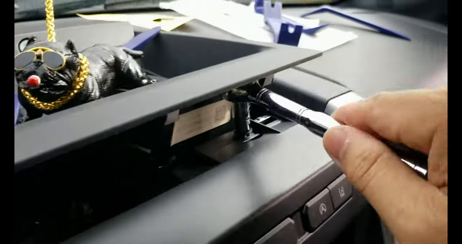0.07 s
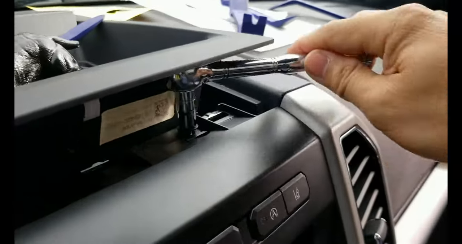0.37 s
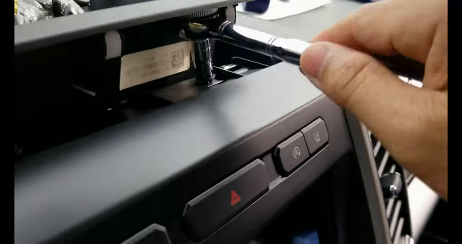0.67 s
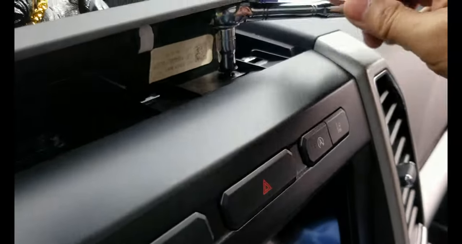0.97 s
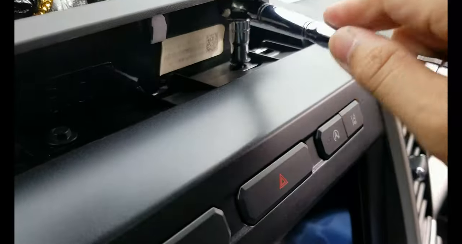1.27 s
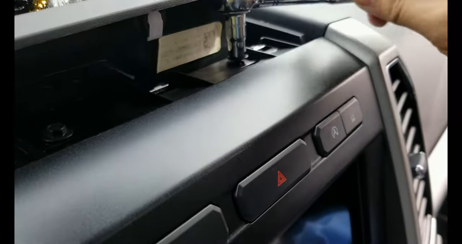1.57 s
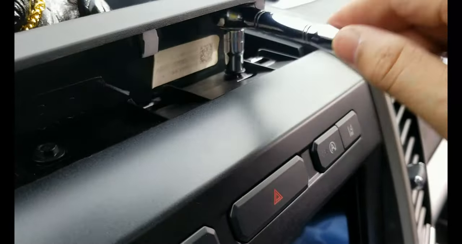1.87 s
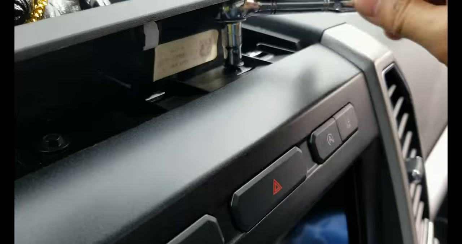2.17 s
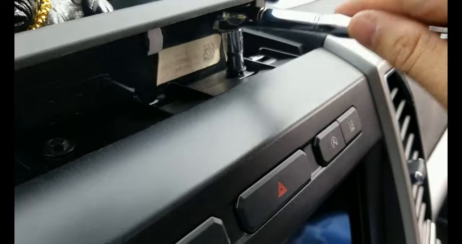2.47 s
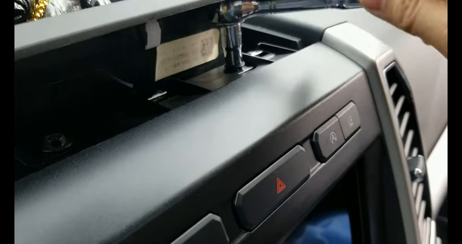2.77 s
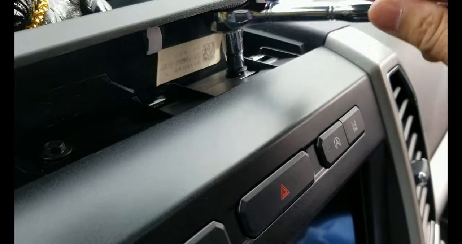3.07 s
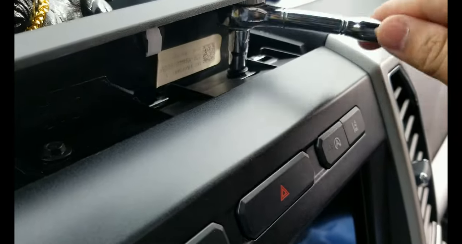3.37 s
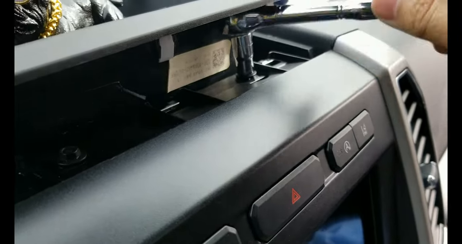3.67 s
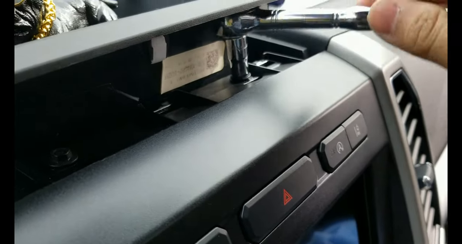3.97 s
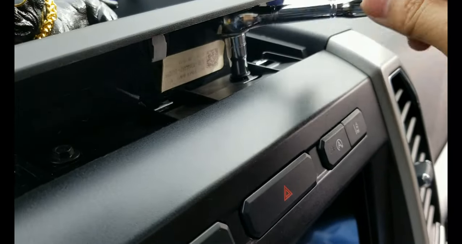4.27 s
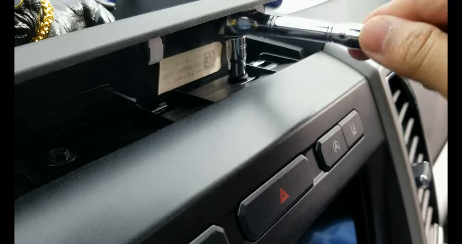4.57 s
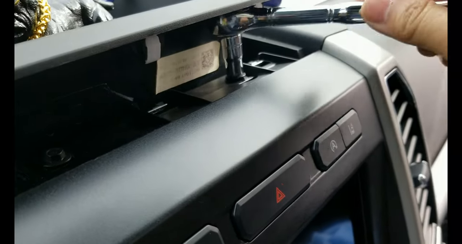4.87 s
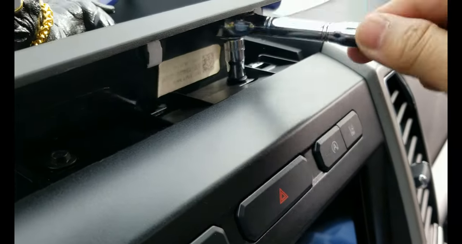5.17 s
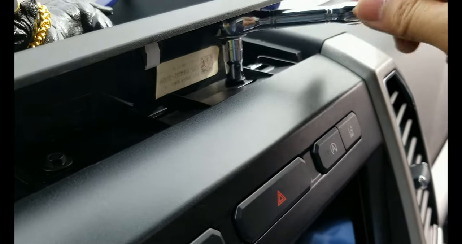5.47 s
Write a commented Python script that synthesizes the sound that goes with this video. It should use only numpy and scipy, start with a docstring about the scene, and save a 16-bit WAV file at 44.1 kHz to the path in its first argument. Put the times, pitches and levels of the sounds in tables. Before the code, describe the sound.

A hand ratchet turns a bolt in a dashboard, heard close and mostly on the left in a quiet vehicle cabin with a very brief echo. The tool slides faintly, then at about 0.2 seconds comes the first back swing: a quick run of five crisp, bright clicks with a slight steel ring. Similar runs of five to eight clicks follow at about 0.8, 1.3, 1.9, 2.5, 3.0, 3.6, 4.2 and 4.8 seconds, each lasting a tenth to a fifth of a second and slowing at its end. Between them, the forward strokes are much quieter, with soft socket knocks, thread rubbing and a faint low dashboard rumble. Sharper metal knocks mix into some runs, notably near 1.4, 2.5 and 3.7 seconds. The last run starts at 5.4 seconds, pauses briefly and adds two clicks, followed by a soft knock around 5.7 seconds.

```python
"""A hand ratchet drives a bolt into a dashboard bracket in a parked vehicle.
First the tool slides faintly on the bolt. Then the handle swings back: the pawl, a small sprung catch,
snaps over the teeth, fast and then slower, and rings the steel head. On the forward stroke the loose
socket knocks, the thread rubs and the dashboard rumbles. Back swing and stroke come ten times, the
last swing with a pause in it, and the small cabin answers with a brief echo."""
import sys
import numpy as np
from scipy import signal
from scipy.fft import rfft, irfft, next_fast_len
from scipy.io import wavfile
from scipy.ndimage import uniform_filter1d, map_coordinates

SR = 44100
rng = np.random.default_rng(int(sys.argv[2]) if len(sys.argv) > 2 else 0)


def inscribe(sig):
    """Save sig as 16-bit PCM at rate SR to the path in sys.argv[1].

    A 1-D sig is mono; a 2-D sig holds one channel per row.
    Samples are clipped to [-1, 1] before scaling.
    """
    pcm = np.round(np.clip(np.atleast_2d(sig).T, -1, 1) * 32767)
    wavfile.write(sys.argv[1], SR, pcm.astype(np.int16))


N = 251811
HIT = np.arange(5120) / SR  # time within one hit, in s

# the tones (modes) each part rings with: f/Hz, level/dB, t60/s (time to fade by 60 dB)
PAWL_MODES = [(5650, -12.5, .028), (10150, -7.5, .031), (12950, -7, .024), (13300, -5, .024),
              (14050, -4, .006), (14550, -6, .006), (15300, -7, .006)]
HEAD_MODES = [(1575, -9.5, 0.012), (1803, -2.5, 0.028), (1957, 2.5, 0.02), (2116, -6.5, 0.021),
              (2690, -16, 0.032), (3210, -10.5, 0.017)]
DASH_MODES = [(198.4, -22, 0.22), (333, -16, .08), (609, -7.5, 0.053), (694.4, 2, 0.036), (991, 2.5, 0.043),
              (1148, 2.5, 0.048)]
# tone colours of steel clack, dashboard thud, rumble and hiss: f/Hz, level/dB
CLACK = [(800, -36), (1400, -2.5), (2000, 6), (2600, -8.5), (3300, -15.5), (4500, -13.5), (9000, -25.5)]
THUD = [(40, -43), (100, -13.5), (250, -2), (450, -11.5), (700, -0.5), (1150, 2), (1600, -15),
        (4000, -41.5)]
RUMBLE = [(20, -27), (40, -9), (62, 4), (95, -0.5), (135, 3.5), (165, -5.5), (195, -0.5), (240, -12.5),
          (330, -1.5), (480, -22), (1000, -48)]
HISS = [(1500, -20), (3200, 8), (4800, -3), (6800, 4.5), (9000, -13), (11000, -7), (15000, -15.5),
        (16500, -14.5)]
# back swings, the last split over two rows:
# first click t/s, teeth, gap at full speed/s, last gap/s, braking (0 = sudden stop, 1 = even gaps)
SWINGS = [(.173, 5, .0165, .032, .6), (.7558, 5, .014, .0407, .51), (1.3326, 7, .0162, .037, .11),
          (1.908, 7, .0148, .0393, .36), (2.4737, 8, .0146, .0592, .42), (3.0405, 7, .0172, .049, .45),
          (3.6433, 7, .0129, .0385, .53), (4.2202, 7, .0135, .0325, .52), (4.8215, 6, .0133, .0462, .56),
          (5.4112, 6, .017, .022, .2), (5.542, 2, .039, .039, .5)]
# force of each swing: snap/dB, its change over the swing/dB, accent on every second tooth/dB,
# head ring/dB, dashboard knock/dB, rub/dB, rumble/dB, rubbing before the first click/s
EFFORT = [(-23.5, -0.5, 1, -27, -35.5, -48.5, -53.5, 0.017),
          (-26, 2.5, -3.5, -29, -36.5, -45, -50.5, 0.017), (-21.5, 5, 3, -27, -34.5, -43, -43, 0.011),
          (-19.5, -4, -1, -26.5, -36.5, -48.5, -52.5, 0.063), (-24, -5, 1, -27, -37, -51, -50.5, 0.046),
          (-24.5, 1, -1, -30.5, -37, -46, -47.5, 0.0081), (-22.5, 2, -2.5, -26, -32.5, -48.5, -49.5, 0.034),
          (-25, -8, -3, -27.5, -35, -47.5, -46.5, 0.028),
          (-24, 6.5, -2.5, -28.5, -36.5, -47.5, -53.5, 0.0044),
          (-19.5, -3, 3.5, -26.5, -36, -44.5, -47.5, .005), (-22.5, -4, 6, -28.5, -36, -44.5, -46, .005)]
# forward strokes: socket catches t/s, wait until the bolt takes the load/s, knock/dB, rub/dB, rumble/dB
STROKES = [(.426, 0.042, -43, -48, -43.5), (0.994, 0.039, -46, -50.5, -48), (1.537, .078, -40, -52, -45),
           (2.174, 0.014, -42.5, -46, -47), (2.754, 0.015, -46, -73, -46),
           (3.288, 0.023, -47.5, -51.5, -45), (3.867, 0.055, -41, -46.5, -46),
           (4.492, 0.0071, -42, -56, -51), (5.097, 0.0084, -40.5, -49.5, -48),
           (5.633, 0.046, -47, -50.5, -46.5)]


def amp(db):
    """Turn decibels into a gain."""
    return 10 ** (np.asarray(db) / 20)


def unit_rms(x):
    """Scale to an average power of 1."""
    return x / np.sqrt(np.mean(x ** 2) + 1e-20)


def unit_energy(x):
    """Scale each row to a total energy of 1."""
    return x / np.linalg.norm(x, axis=-1, keepdims=True)


def fade(t60):
    """Die away by 60 dB every t60 seconds."""
    return np.exp(-np.log(1000) * HIT / t60)


def along(points, hz):
    """Read between (f/Hz, value) points on a log frequency axis."""
    f, value = np.transpose(points)
    return np.interp(np.log(hz + 1), np.log(f + 1), value)


def wobble(rate):
    """A smooth random curve through rate points a second."""
    points = rng.standard_normal(int(N * rate / SR) + 4)
    return map_coordinates(points, [np.arange(N) * rate / SR])


def filtered(x, response):
    """Multiply each frequency in x by response(hz)."""
    size = next_fast_len(N + SR // 2)
    return irfft(rfft(x, size) * response(np.fft.rfftfreq(size, 1 / SR)), size)[..., :N]


def causal(colour):
    """A filter of this colour that never sounds before it is hit (minimum phase)."""
    size = len(HIT)
    cepstrum = irfft(np.log(amp(along(colour, np.fft.rfftfreq(size, 1 / SR)))))
    cepstrum[1:size // 2] *= 2
    cepstrum[size // 2 + 1:] = 0
    return np.exp(rfft(cepstrum))


def rush(colour, apart):
    """Stereo noise; apart (radians) makes the two sides less alike."""
    mid, side = filtered(rng.standard_normal((2, N)), lambda hz: amp(along(colour, hz)))
    return unit_rms(np.cos(apart) * mid + np.sin(apart) * np.array([side, -side]))


def still_air():
    """A very faint, low hush lies under everything."""
    # f/Hz, level/dB
    hush = [(30, -13.5), (70, 10.5), (300, -21.5), (2000, -19.0), (4000, -22.0), (15000, -18)]
    return amp(-78) * rush(hush, apart=0.37)


def swells(starts, lengths, levels_db, rise, fall):
    """Summed power of movements that rise, hold and fall; rise and fall are in dB/s."""
    t = np.arange(N) / SR
    power = np.zeros(N)
    for start, length, db in zip(starts, lengths, levels_db):
        near = slice(*np.searchsorted(t, [start - .5, start + length + .5]))
        before = np.maximum(start - t[near], 0)
        after = np.maximum(t[near] - start - length, 0)
        power[near] += amp(db - rise * before - fall * after) ** 2
    return power


def tooth_times(start, teeth, fast_gap, last_gap, braking):
    """The hand brakes towards the end of a swing, so the gaps between clicks grow."""
    teeth_left = np.arange(round(teeth) - 1)[::-1]
    gaps = fast_gap + (last_gap - fast_gap) * np.clip(braking, 0, 1) ** teeth_left
    return start + np.append(0, np.cumsum(gaps))


def friction_levels():
    """Rumble, rub and hiss in dB over time: each swing, stroke and slide makes a swell."""
    # the tool slides as the hand leans on it: t/s, length/s, hiss/dB, rub/dB, rumble/dB
    slides = [(0, 0.03, -61.5, -57, -63.5), (0.305, 0.019, -69.5, -57, -48.5),
              (0.632, 0.079, -74, -58.5, -54.5), (1.148, 0.014, -70, -53.5, -49),
              (1.264, 0.054, -76, -51, -52), (1.456, 0.23, -58, -55, -55.5),
              (1.76, 0.25, -68.5, -61, -56.5), (2.243, 0.082, -81.5, -66, -59),
              (2.667, 0.057, -79, -61, -58), (3.272, 0.18, -67, -59.5, -58),
              (3.548, 0.16, -60.5, -47.5, -51), (4.091, .07, -69, -56, -63),
              (4.498, 0.035, -76, -50.5, -54.5), (4.713, 0.015, -87, -62.5, -60),
              (5.1, 0.019, -85, -58.5, -58), (5.354, .03, -91, -62, -62)]
    grip_rumble_db, grip_rub_db, grip_hiss_db = -65.5, -70.5, -87.5  # the hand is never quite still
    rumble_hold, rub_hold = .8, .73  # share of a swing before braking fades the sound
    settle_s = 0.0023  # the dashboard flexes on after the bolt takes the load
    first, last = np.transpose([tooth_times(*swing)[[0, -1]] for swing in SWINGS])
    *_, swing_rub, swing_rumble, lead = np.transpose(EFFORT)
    caught, slack, _, stroke_rub, stroke_rumble = np.transpose(STROKES)
    slid, length, slide_hiss, slide_rub, slide_rumble = np.transpose(slides)
    rumble = (amp(grip_rumble_db) ** 2
              + swells(first, rumble_hold * (last - first), swing_rumble, rise=270, fall=210)
              + swells(caught + slack, np.full_like(slack, settle_s), stroke_rumble, rise=330, fall=320)
              + swells(slid, length, slide_rumble, rise=260, fall=170))
    rub = (amp(grip_rub_db) ** 2
           + swells(first - lead, lead + rub_hold * (last - first), swing_rub, rise=345, fall=260)
           + swells(caught, slack + settle_s, stroke_rub, rise=830, fall=277)
           + swells(slid, length, slide_rub, rise=260, fall=170))
    hiss = amp(grip_hiss_db) ** 2 + swells(slid, length, slide_hiss, rise=260, fall=170)
    return 10 * np.log10([rumble, rub, hiss])


def friction():
    """The thread rubs unevenly, sliding surfaces hiss and the hand's push shakes the dashboard."""
    rumble_db, rub_db, hiss_db = friction_levels()
    pressure = wobble(130)  # the surfaces press together unevenly
    rumble = amp(rumble_db) * rush(RUMBLE, apart=0.26)
    rub = thread_slips(rub_db + 2.8 * pressure)
    grit = amp(rub_db - 20.5 + 6.2 * pressure) * rush(HISS, apart=1.0)
    hiss = amp(hiss_db + 1.8 * pressure + 1.3 * wobble(20)) * rush(HISS, apart=1.0)
    return rumble + rub + grit + hiss


def thread_slips(level_db):
    """The thread sticks and slips: many tiny jerks ring the socket's shaft and the cabin."""
    # tone colour of the rubbing: f/Hz, level/dB
    rub_colour = [(200, -23), (450, -3), (730, -0.5), (1100, -2.5), (1400, -2.5), (2100, -0.5),
                  (2600, -11.5), (3400, -15), (4500, -32.5), (9000, -40.5)]
    slips_per_s, shaft_hz, width_hz = 1100, 1870, 260
    jerks = unit_rms((rng.random(N) < slips_per_s / SR) * rng.standard_normal(N))
    hz = np.fft.rfftfreq(len(HIT), 1 / SR)
    shaft = 1 + 1j * hz * width_hz / (shaft_hz ** 2 - hz ** 2 + 1j * hz * width_hz)
    one_slip = unit_energy(irfft(causal(rub_colour) * shaft))
    scrape = signal.oaconvolve(jerks * amp(level_db), one_slip)[:N]
    paths = cabin_echoes(count=5)
    shares = np.array([wobble(10) for _ in paths])  # the moving hand keeps changing the echo paths
    shares /= np.linalg.norm(shares, axis=0)
    echo = sum(share * signal.oaconvolve(scrape[None], path, axes=1)[:, :N]
               for share, path in zip(shares, paths))
    return scrape + amp(0.5) * echo


def cabin_echoes(count):
    """Short stereo echoes from windscreen and trim; the moving hand makes each one new."""
    # how long the cabin rings: f/Hz, t60/s
    ring_times = [(150, 0.26), (700, 0.041), (2000, 0.044), (6000, 0.061), (14000, 0.049)]
    hz, t, noise = signal.stft(rng.standard_normal((count, 2, len(HIT))), SR, nperseg=128)
    decay = np.exp(-np.log(1000) * t / along(ring_times, hz)[:, None])
    tails = signal.istft(noise * decay, SR, nperseg=128)[1]
    return unit_energy(tails * (1 - np.exp(-HIT / 0.00037)))


def struck(times, levels_db, modes, colour, contact_t60, ring_db, echo_db, rise_s):
    """Blows on one part: a chattering contact, the part's ring and the echo (echo_db: left, right)."""
    count, size = len(times), len(HIT)
    attack = 1 - np.exp(-HIT / rise_s)
    chatter = unit_energy(np.sign(rng.standard_normal((count, size))) * attack * fade(contact_t60))
    response = causal(colour)
    crack = irfft(rfft(chatter) * response / np.sqrt(np.mean(np.abs(response) ** 2)))
    ring = np.zeros((count, size))
    for hz, db, t60 in modes:
        strength, grip, side = rng.standard_normal((3, count, 1))  # no two contacts are alike
        pitch = hz + grip / t60  # the more a contact damps a tone, the more it detunes it
        ring += np.sign(side) * amp(db + 2 * strength) * fade(t60) * np.sin(2 * np.pi * pitch * HIT)
    direct = (crack + amp(ring_db) * unit_energy(ring * attack))[:, None]
    echo = signal.fftconvolve(direct, cabin_echoes(count), axes=-1)[..., :size]
    hits = direct + amp(echo_db)[:, None] * echo
    # each hit's level is set by its loudest 10 ms on the left
    loudest = np.sqrt(uniform_filter1d(hits[:, 0] ** 2, size=441, axis=-1).max(axis=-1))
    out = np.zeros((2, N + size))
    for start, gain, hit in zip(times, amp(levels_db) / loudest, hits):
        out[:, round(start * SR):][:, :size] += gain * hit
    return out[:, :N]


def pawl_clicks():
    """One row for each tooth: t/s, snap/dB, head ring/dB, dashboard knock/dB."""
    # teeth snap hardest mid-swing, while starting and stopping jolt the tool:
    # share of the swing, snap/dB, head ring/dB, dashboard knock/dB
    jolts = [(0, -0.3, 3.5, 3), (.5, 0.8, -2, -1), (1.001, -1.64, 0.5, -2.5)]
    where, snap_jolt, head_jolt, dash_jolt = np.transpose(jolts)
    scatter_db = 1.2
    rows = []
    for swing, (snap_db, change_db, accent_db, head_db, dash_db, *_) in zip(SWINGS, EFFORT):
        times = tooth_times(*swing)
        share = np.linspace(0, 1, len(times))
        accent = accent_db * (np.arange(len(times)) % 2 - .5)
        snap = snap_db + np.interp(share, where, snap_jolt) + change_db * (share - .5) + accent
        head = head_db + np.interp(share, where, head_jolt) - .6 * accent  # clean snaps shake it less
        dash = dash_db + np.interp(share, where, dash_jolt)
        rows += zip(times, snap, head, dash)
    return np.array(rows) + scatter_db * rng.standard_normal(np.shape(rows)) * [0, 1, 1, 1]


def pawl():
    """The sprung pawl hits the next tooth; the blow runs through the head into socket and dashboard."""
    # tone colour of the snap: f/Hz, level/dB
    snap_colour = [(2000, -20.5), (3200, -12.5), (5500, -14.5), (8000, -11.5), (11000, -10.5), (12500, -6),
                   (14000, 2), (15400, 0), (16500, -21)]
    # hard snaps that also ring the socket's wall: t/s, level/dB
    wall_hits = [(.1745, -30), (.1925, -24), (.823, -34), (5.502, -29), (5.541, -30)]
    # tones of that wall: f/Hz, level/dB, t60/s
    wall_modes = [(2715, -7.5, 0.0094), (3050, 7.5, 0.013), (3550, -22, 0.12)]
    times, snap_db, head_db, dash_db = pawl_clicks().T
    snap = struck(times, snap_db, PAWL_MODES, snap_colour,
                  contact_t60=0.003, ring_db=-6.5, echo_db=(-4, 4.5), rise_s=0.00077)
    head = struck(times, head_db, HEAD_MODES, CLACK,
                  contact_t60=0.013, ring_db=0.5, echo_db=(-0.5, 4.5), rise_s=0.0016)
    dash = struck(times, dash_db, DASH_MODES, THUD,
                  contact_t60=0.014, ring_db=6, echo_db=(-5.5, 1), rise_s=0.0024)
    wall = struck(*np.transpose(wall_hits), wall_modes, CLACK,
                  contact_t60=0.0068, ring_db=6.5, echo_db=(-23, -1.5), rise_s=0.0034)
    return snap + head + dash + wall


def socket_knocks():
    """Stray knocks, and two for each stroke: the socket catches, then the bolt takes the load."""
    # the loose socket rocks on the bolt: t/s, ring/dB, tick offset/dB, dashboard offset/dB
    stray_knocks = [(.264, -37.5, -11, -8), (.325, -42, -10, -9.5), (.69, -43.5, -13, -0.5),
                    (.752, -41, -12, -4), (.85, -25, -4, -16.5), (1.316, -20, -20, -1),
                    (1.403, -19.5, -1, -9.5), (1.537, -48, -19, 14.5), (2.443, -41, -13, 3),
                    (2.53, -22, -9, -9.5), (2.653, -28.5, -8, -8), (3.371, -34.5, -9, -27),
                    (3.47, -41, -9.5, -24), (3.596, -30, -4.5, -2), (3.625, -25, -11, -8),
                    (3.711, -21, 0.5, -13.5), (3.754, -30.5, -16, -4), (4.025, -48, -9, -14),
                    (4.158, -39.5, -14, -2), (4.33, -26, -9.5, -12), (4.419, -39.5, -12.5, -20),
                    (4.78, -43, -17, 1.5), (4.817, -29.5, 1, -7), (4.971, -30, -7, 3), (5.4, -35, -26, 6.5)]
    # a stroke's two knocks: ring above the stroke's knock/dB, tick offset/dB, dashboard offset/dB
    catch = (1.04, -25, -2)
    bite = (0.63, -12.5, -5)
    rows = list(stray_knocks)
    for start, slack, db, _, _ in STROKES:
        for delay, (ring_db, tick_db, dash_db) in [(0, catch), (slack, bite)]:
            rows.append((start + delay, db + ring_db, tick_db, dash_db))
    return rows


def socket():
    """The loose socket knocks bluntly on the same steel and shoves the dashboard into a low ring."""
    times, db, tick_db, dash_db = np.transpose(socket_knocks())
    tick = struck(times, db + tick_db - 6.5, PAWL_MODES, HISS,
                  contact_t60=0.014, ring_db=-27.5, echo_db=(7, -5), rise_s=0.00034)
    head = struck(times, db - .6, HEAD_MODES, CLACK,
                  contact_t60=0.014, ring_db=7, echo_db=(-0.5, 1.5), rise_s=0.00023)
    dash = struck(times, db + dash_db - .6, DASH_MODES, THUD,
                  contact_t60=0.035, ring_db=8, echo_db=(-5, -1), rise_s=0.00056)
    shove = struck(times, db + dash_db - 12, DASH_MODES[:2], RUMBLE,
                   contact_t60=0.046, ring_db=3, echo_db=(-5.5, -5.5), rise_s=0.00052)
    return tick + head + dash + shove


def scene():
    """The left microphone faces the tool; the right one is farther off, shaded by its housing."""
    # how much quieter the right side is: f/Hz, loss/dB
    shade = [(60, 7.5), (250, 11.5), (600, 11), (1100, 13), (1900, 28), (3200, 18), (5600, 15), (7300, 23),
             (10000, 10.5), (11500, 8), (14500, 19.5)]
    lag_s = 0.000297
    left, right = pawl() + socket() + friction()
    right = filtered(right, lambda hz: amp(-along(shade, hz)) * np.exp(-2j * np.pi * hz * lag_s))
    return np.array([left, right]) + still_air()


def record(dry):
    """The very highest treble is cut off steeply."""
    top_hz = 16500
    return filtered(dry, lambda hz: 1 / np.sqrt(1 + (hz / top_hz) ** 120))


dry = scene()
out = record(dry)
inscribe(out)
```